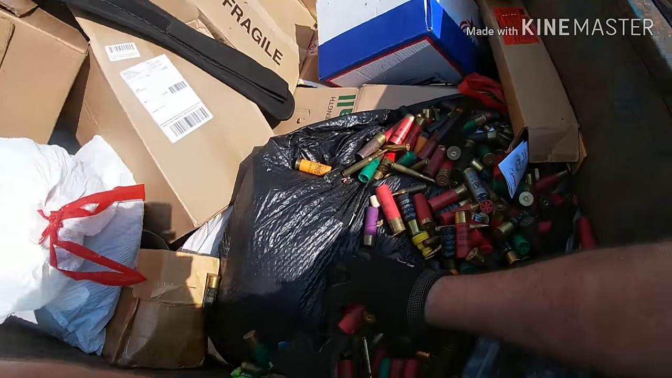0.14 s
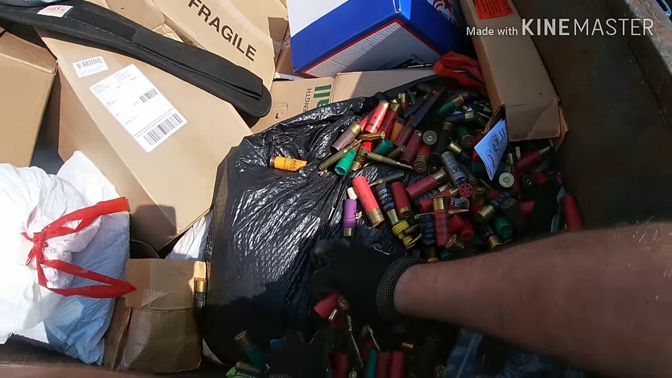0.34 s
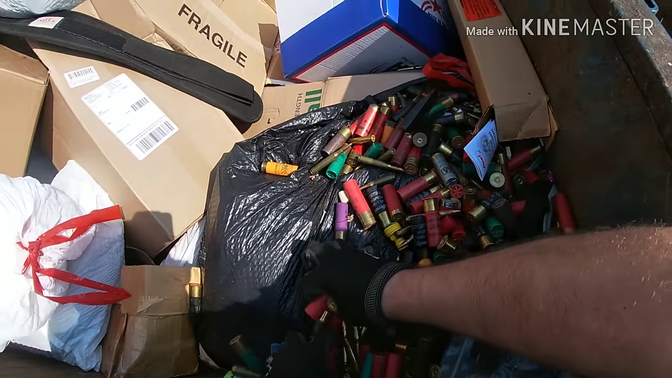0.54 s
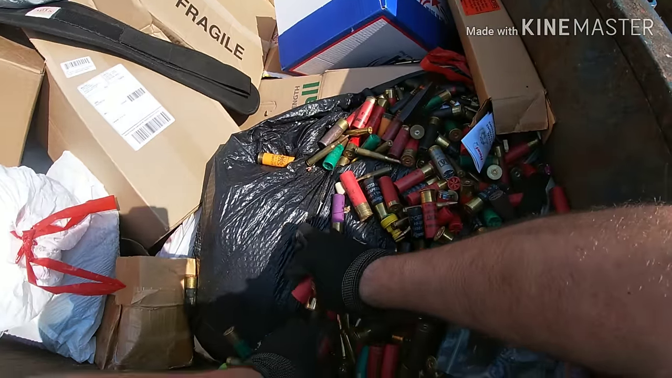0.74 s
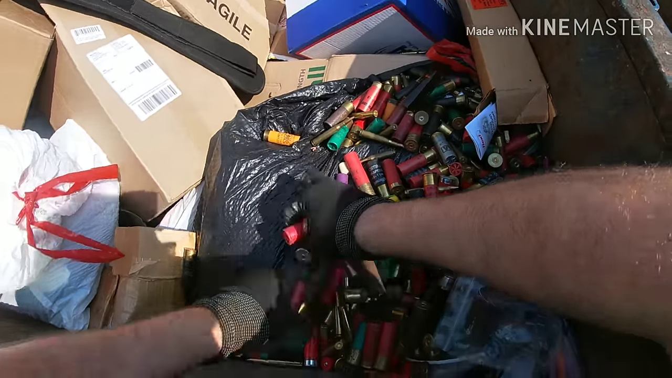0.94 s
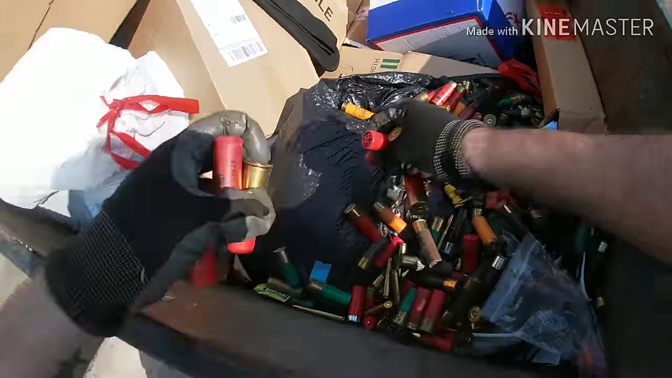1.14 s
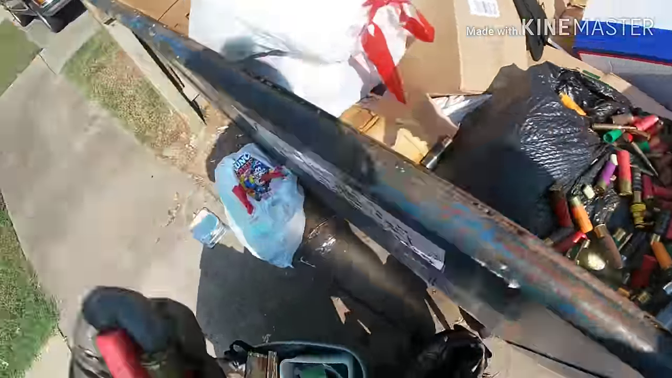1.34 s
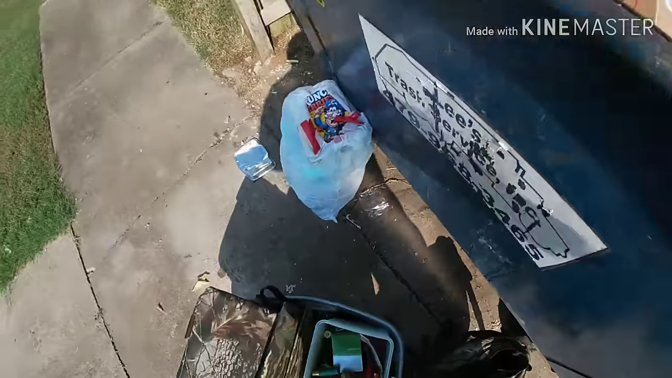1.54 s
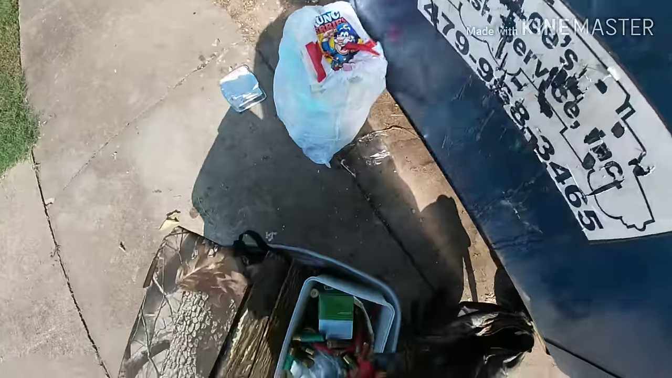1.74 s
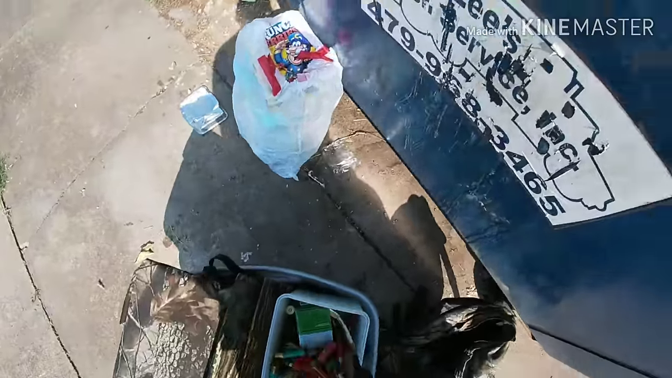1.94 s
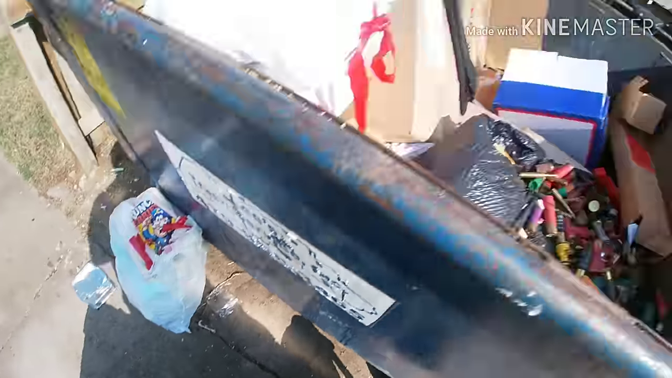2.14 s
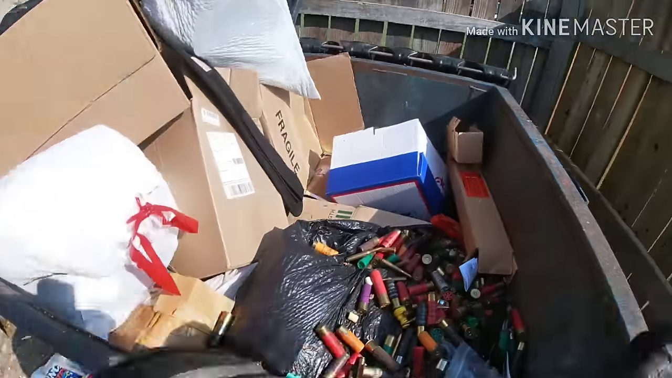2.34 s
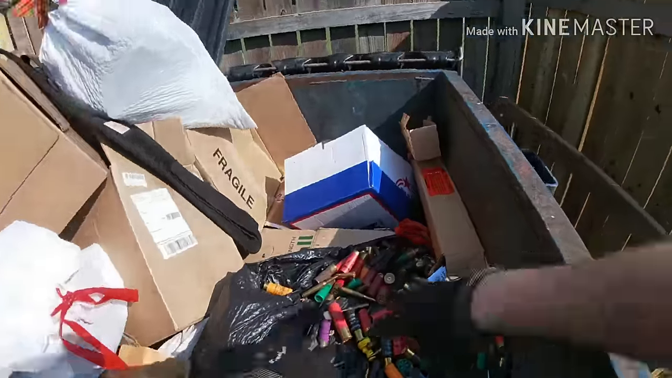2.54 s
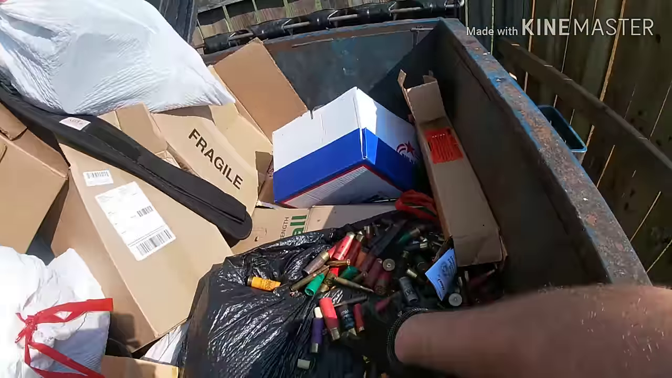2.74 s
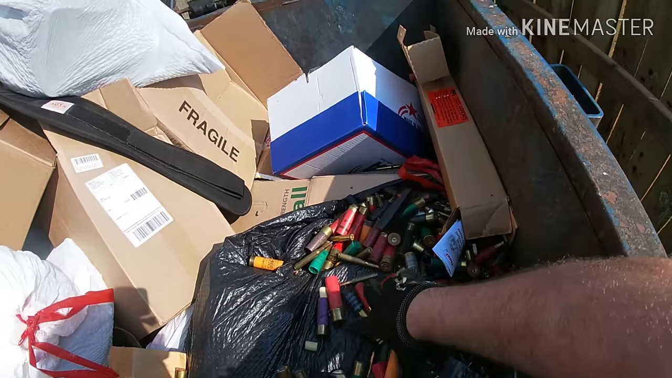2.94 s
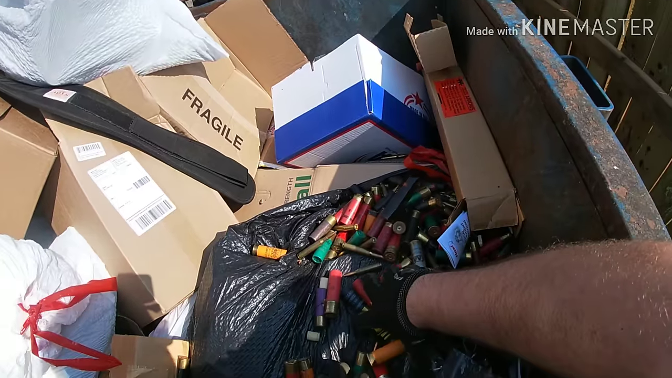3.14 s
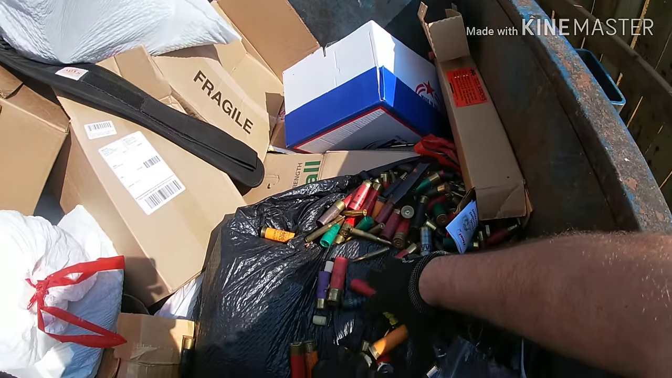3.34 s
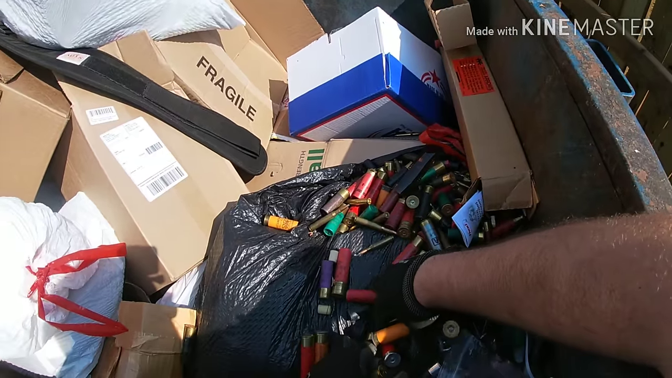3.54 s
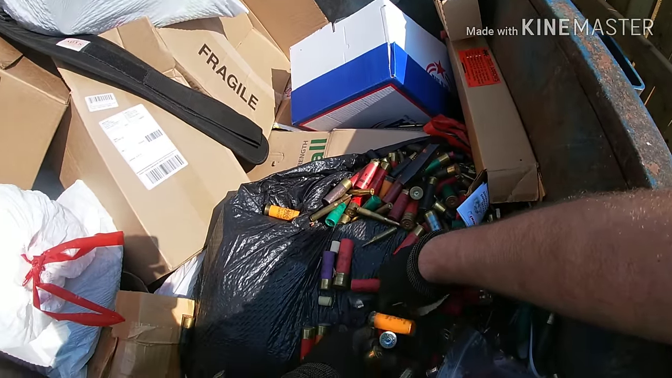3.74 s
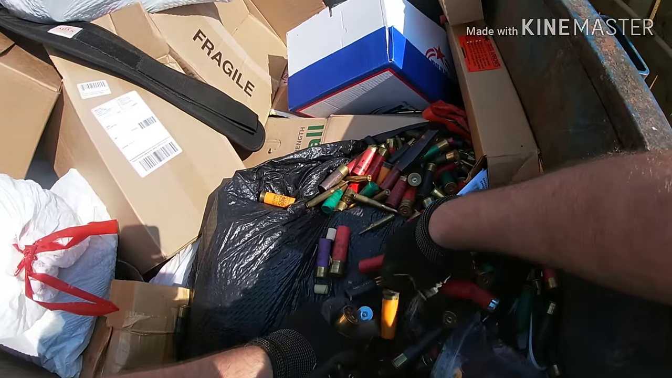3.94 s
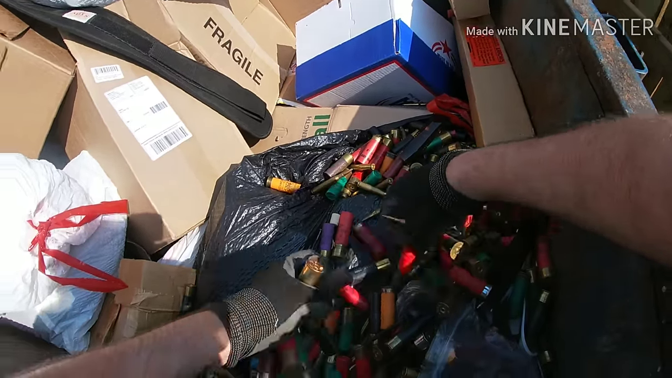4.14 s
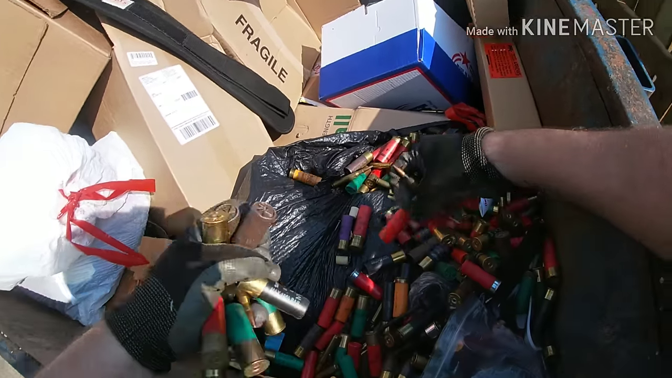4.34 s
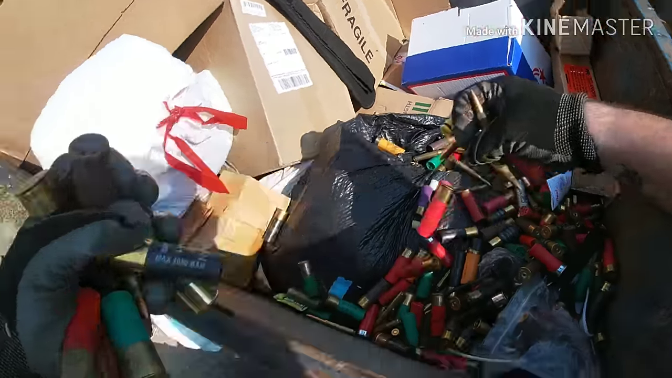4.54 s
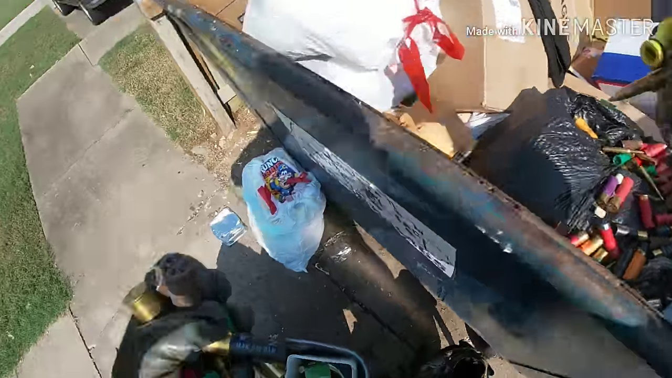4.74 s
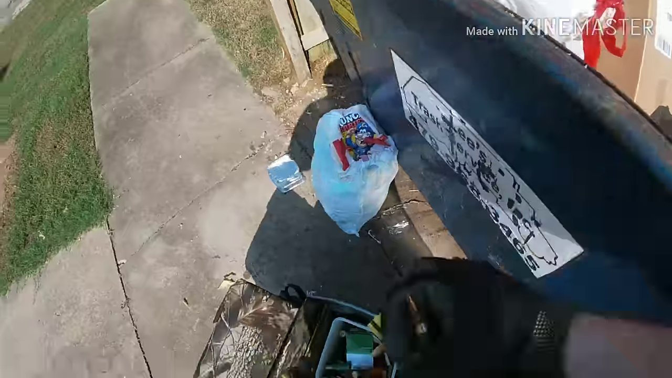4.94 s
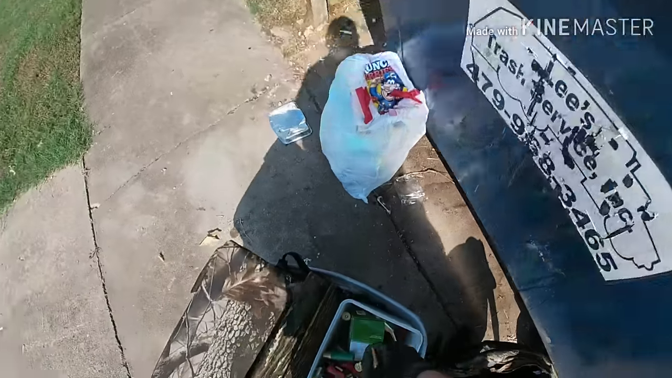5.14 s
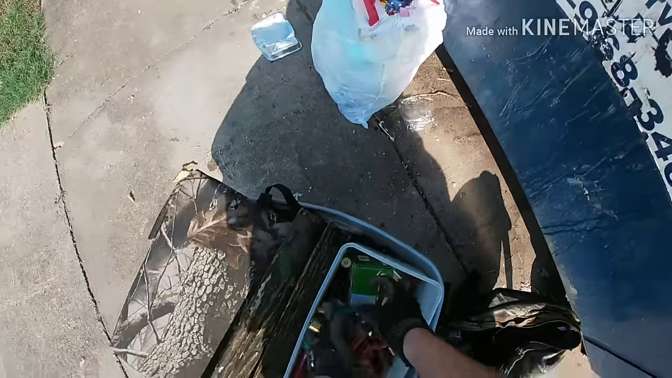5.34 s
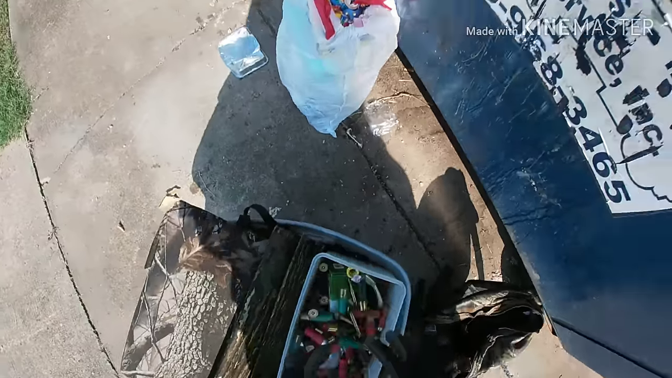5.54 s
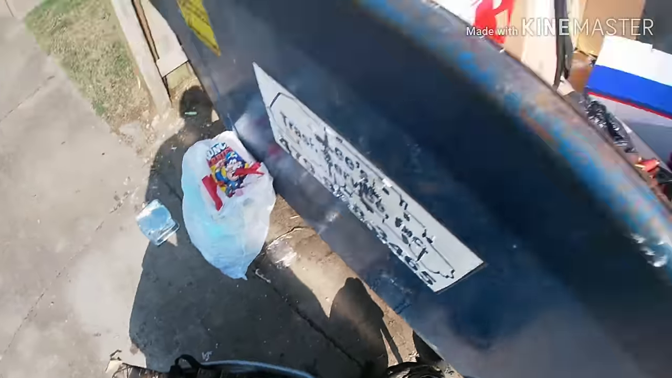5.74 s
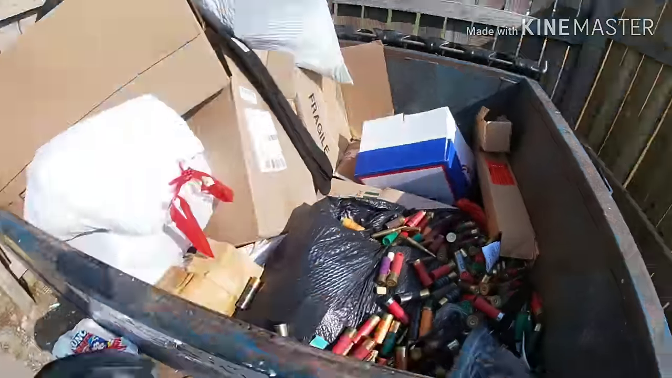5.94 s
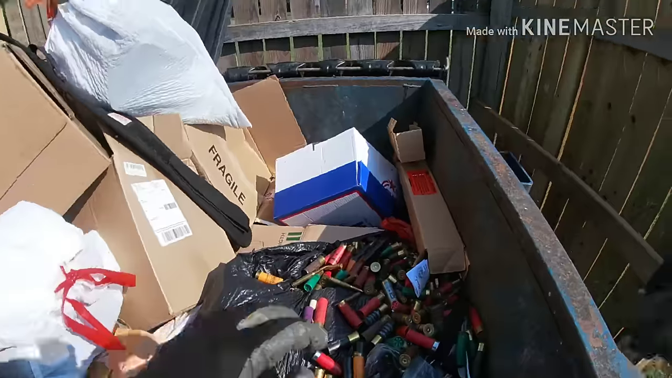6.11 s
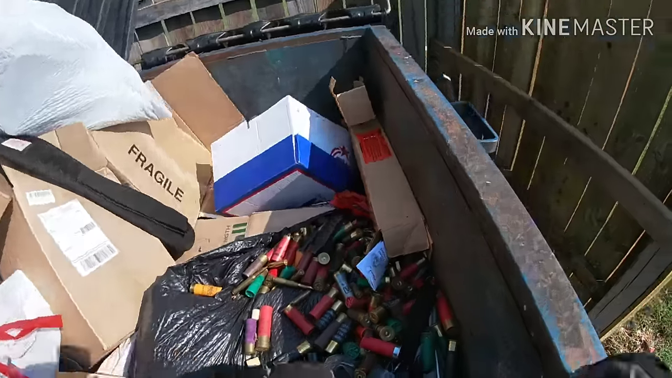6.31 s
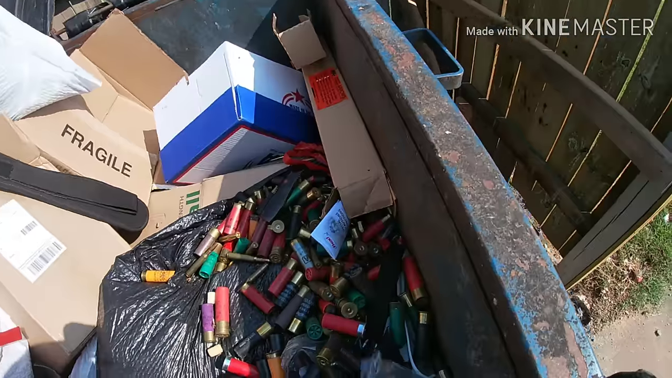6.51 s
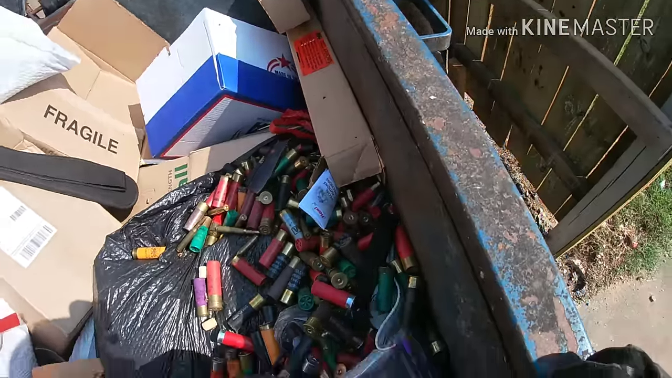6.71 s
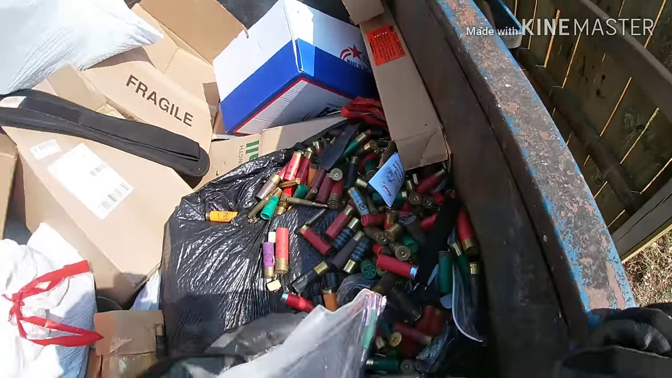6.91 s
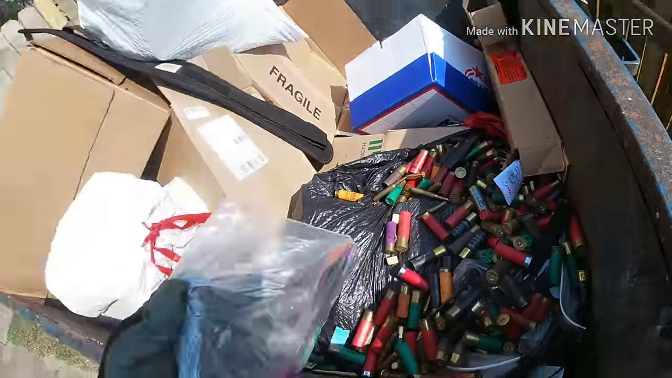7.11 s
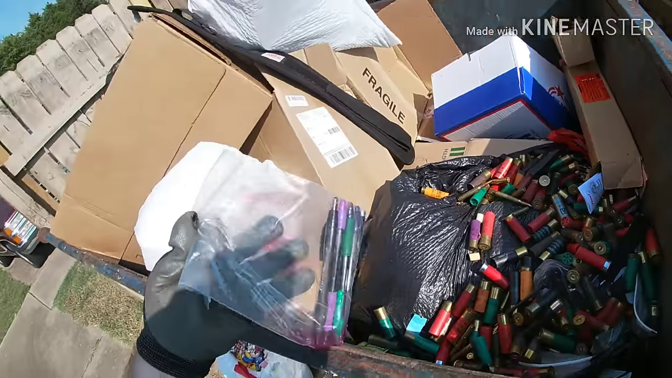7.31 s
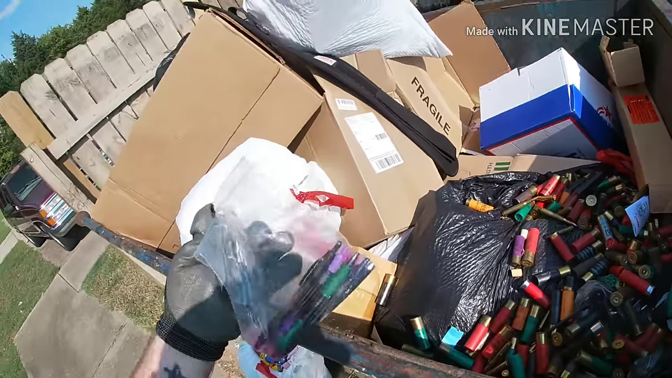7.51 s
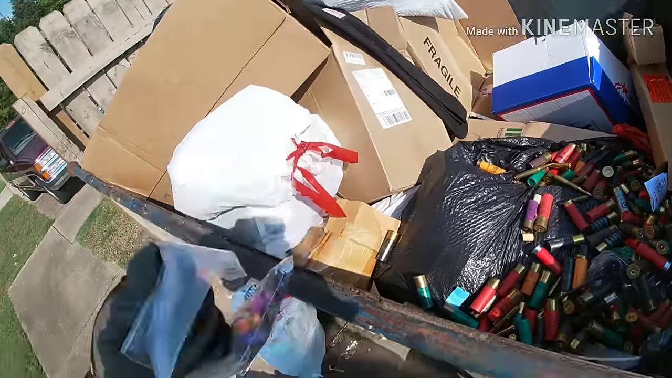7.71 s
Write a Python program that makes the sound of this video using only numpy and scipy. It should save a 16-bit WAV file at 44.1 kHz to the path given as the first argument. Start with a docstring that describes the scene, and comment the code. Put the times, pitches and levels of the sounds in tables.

```python
"""Plastic hulls clack and rattle over a sack rumble as gloved hands rake a heap of spent shotgun shells.
Brass heads ring briefly, sack and tub thud; low wind or handling rumble on a chest-worn microphone, far hum.
Handfuls drop into a plastic tub; later a thin plastic bag is lifted and crinkles.
Rubbing is clumped random grains through resonances; clacks, thuds and rings are timed decaying bursts;
low rumble, outdoor air and clothing are filtered noise."""
import sys
import numpy as np
from scipy import signal
from scipy.fft import rfft, irfft
from scipy.io import wavfile
from scipy.ndimage import uniform_filter1d

SR = 44100
rng = np.random.default_rng(int(sys.argv[2]) if len(sys.argv) > 2 else 0)


def int16_out(signal):
    """Quantize to a 16-bit WAV file."""
    q = np.round(np.clip(np.atleast_2d(signal).T, -1, 1) * 32767)
    wavfile.write(sys.argv[1], SR, q.astype(np.int16))


N = 347067

# stirring of heap and bag, one list per reach of the hands: (time [s], rattle [dB], sack rumble [dB])
REACHES = [
    [(0.0, -46, -32), (0.22, -49, -38.5), (0.27, -39, -35), (0.46, -38, -27), (0.55, -44.5, -29.5),
     (0.65, -39, -27.5), (0.85, -39, -25.5), (1.14, -44.5, -30.5), (1.29, -49.5, -37), (1.45, -58, -47),
     (1.66, -61, -45.5)],
    [(1.73, -58, -45.5), (1.99, -53, -39), (2.19, -36.5, -23), (2.24, -45, -26.5), (2.32, -56, -45),
     (2.39, -48, -35), (2.47, -82, -45)],
    [(2.72, -59, -44), (2.84, -51, -47.5), (2.93, -34.5, -24), (2.99, -40.5, -40), (3.09, -32, -26),
     (3.29, -40, -30.5), (3.4, -43.5, -36), (3.46, -31.5, -28.5), (3.68, -38.5, -36), (3.94, -42, -36.5),
     (4.15, -35.5, -33), (4.31, -39, -36.5), (4.43, -52.5, -43.5), (4.56, -46, -58), (4.68, -62, -56)],
    [(4.79, -46, -32.5), (4.9, -48, -40), (5.17, -62, -48)],
    [(5.44, -63, -49), (5.52, -31.5, -25.5), (5.61, -26.5, -16.5), (5.65, -39.5, -25.5),
     (5.77, -31.5, -19.5), (5.85, -46, -36), (6.04, -55.5, -40.5), (6.2, -69, -75)],
    [(6.52, -60, -55), (6.64, -50, -54), (6.78, -37, -38), (6.96, -40, -37), (7.13, -33, -43.5),
     (7.22, -60.5, -62), (7.34, -40.5, -41), (7.52, -39.5, -40.5), (7.6, -50.5, -43), (7.76, -53.5, -49.5),
     (7.87, -40, -50)],
]
# colour of the rattle: (frequency [Hz], density [dB per Hz])
RATTLE_COLOUR = [(710, -12), (1200, -19.5), (1360, -5.5), (1690, -3), (2280, -1.5), (3900, 0), (4570, -5.5),
                 (5150, -2), (10200, -17.5), (12600, -69), (15500, -56)]
# brass in the heap: (frequency [Hz], width [Hz], level [dB])
BRASS_PINGS = [(4260, 49, 8.5), (4900, 120, -8), (6300, 300, 7), (9900, 150, -30), (10200, 110, -11)]
# air in the hulls: (frequency [Hz], width [Hz], level [dB])
HULL_AIR = [(503, 117, 1), (867, 466, -0.5), (1052, 890, -3.5)]
# sack and boxes under the heap: (frequency [Hz], width [Hz], level [dB])
SACK_WALLS = [(110.5, 11, 1.5), (155, 50.5, -1), (231, 71, 0.5), (298, 99, -2), (440, 111, -8)]
# level of the low rumble over time, wind or handling: (time [s], level [dB])
RUMBLE_LEVEL = [(0.0, -44), (0.48, -43), (1.21, -35.5), (1.25, -27), (1.4, -42), (1.78, -30.5), (1.84, -56),
                (2.26, -30.5), (2.61, -48), (2.89, -40), (4.58, -45), (4.78, -41), (4.86, -22), (4.91, -42),
                (5.15, -50), (5.26, -23.5), (5.28, -34), (5.33, -24), (5.48, -26.5), (5.54, -54),
                (5.68, -24.5), (6.38, -62.5), (6.49, -44.5), (7.45, -51.5), (7.83, -37.5), (7.87, -40)]
# far outdoor noise: (frequency [Hz], density [dB per Hz])
AIR_COLOUR = [(18, -15), (30, 2), (168, -3.5), (223, 5), (320, -22.5), (383, -17), (640, -10.5),
              (1310, -16), (4520, -31), (5840, -31), (8590, -29), (12600, -89), (14000, -77)]
# a far machine: (frequency [Hz], width [Hz], relative level [dB])
HUM_MODES = [(382, 9, -52), (226, 20, -56)]
# hum rises and sinks as the wearer turns: (time [s], gain [dB])
HUM_GAIN = [(0, -3), (1.5, 5), (2.6, 1), (4.5, -0.5), (5.2, 2.5), (6.3, -4.5), (7.87, -3.5)]
# hull on hull, or a snap of the bag: (time [s], relative level [dB], pitch [Hz],
# hollow knock [relative dB], bright edge [relative dB], scatter before clipping [s])
CONTACTS = [(0.2369, -28, 1390, -35, -54, 0.1), (0.2849, -19, 2150, -24, -53, 0.044),
            (0.3373, -19, 1170, -29, -61, 0.021), (0.362, -34, 1310, -32, -52, 0.047),
            (0.383, -28, 1340, -36, -50, 0.058), (0.4, -25, 2120, -28, -50, 0.067),
            (0.4384, -30, 3200, -23, -58, 0.056), (0.4883, -24, 5030, -32, -45, 0.065),
            (0.5746, -34, 2450, -49, -55, 0.048), (0.5906, -24, 3480, -30, -51, 0.071),
            (0.608, -24, 4260, -24.5, -57, 0.097), (0.6514, -41, 4900, -36, -59, 0.058),
            (0.678, -16, 4840, -32, -42, 0.1), (0.7319, -16, 1400, -22, -24, 0.058),
            (0.7873, -17, 3270, -43, -38, 0.039), (0.7928, -10.5, 3070, -47, -45, 0.067),
            (0.8112, -21, 4160, -27, -45, 0.089), (0.833, -20, 1320, -19.5, -52, 0.096),
            (0.8987, -14.5, 2040, -24, -50, 0.051), (0.9373, -19, 4090, -29, -43, 0.042),
            (0.997, -12, 1670, -33, -39, 0.064), (1.0137, -14.5, 4900, -21.5, -24, 0.088),
            (1.126, -28, 1420, -30.5, -40, 0.084), (1.2309, -28.5, 1270, -28.5, -50, 0.094),
            (2.0155, -13, 1130, -22, -40, 0.066), (2.0306, -13, 1200, -37, -39, 0.11),
            (2.0613, -17, 1160, -28, -29, 0.1), (2.0878, -11, 2480, -17.5, -46, 0.13),
            (2.1122, -7.5, 3460, -16, -20, 0.069), (2.1715, -22, 1380, -37, -39, 0.07),
            (2.2089, -25, 5230, -45, -36, 0.052), (2.2283, -27.5, 5900, -50, -36, 0.09),
            (2.2758, -24.5, 4000, -36, -33, 0.066), (2.356, -37, 2200, -34, -47, 0.087),
            (2.4387, -40, 1430, -38, -65, 0.049), (2.874, -24.5, 2830, -34, -40, 0.11),
            (2.8981, -6.5, 3650, -34, -48, 0.035), (2.9165, -17, 3200, -26, -45, 0.061),
            (2.9466, -32, 1670, -45, -41, 0.05), (3.0194, -14.5, 3660, -42, -50, 0.067),
            (3.0587, -22.5, 1510, -35, -29, 0.076), (3.1012, -20, 1670, -43, -34, 0.058),
            (3.1346, -21, 3760, -49, -38, 0.046), (3.1677, -20.5, 1670, -30, -38, 0.086),
            (3.1954, -12.5, 3500, -36, -53, 0.046), (3.2382, -18, 3000, -43, -42, 0.05),
            (3.2673, -8, 3960, -53, -38, 0.041), (3.2979, -39, 1280, -21, -58, 0.058),
            (3.315, -20, 3420, -43, -33, 0.035), (3.3548, -20, 3830, -49, -31, 0.034),
            (3.3858, -13.5, 1730, -27, -52, 0.082), (3.427, -24, 1760, -37, -41, 0.048),
            (3.4485, -15, 1980, -32, -33, 0.058), (3.4733, -16, 4200, -26, -46, 0.033),
            (3.4933, -18, 2750, -28, -31, 0.12), (3.545, -20.5, 3390, -33, -31, 0.054),
            (3.5629, -15, 1340, -36, -33, 0.049), (3.5927, -18, 3900, -49, -29, 0.052),
            (3.6184, -16, 5400, -23, -39, 0.036), (3.6581, -26.5, 3190, -38, -41, 0.058),
            (3.675, -26, 2440, -29, -41, 0.044), (3.7089, -25, 3160, -25, -35, 0.04),
            (3.7684, -22.5, 2970, -36, -48, 0.069), (3.8096, -25, 4870, -38, -46, 0.089),
            (3.8487, -24, 4330, -37, -31, 0.05), (3.902, -21, 4060, -49, -28, 0.065),
            (3.9479, -29.5, 4120, -34, -44, 0.053), (3.9662, -24.5, 3510, -38, -36, 0.067),
            (3.9849, -19, 5000, -33, -41, 0.099), (4.0217, -23, 3320, -32, -36, 0.051),
            (4.0374, -28, 3970, -28, -38, 0.078), (4.0575, -30, 1220, -43, -30, 0.058),
            (4.1054, -20, 3960, -47, -40, 0.058), (4.123, -15.5, 4140, -30, -32, 0.11),
            (4.1533, -13, 3520, -42, -32, 0.1), (4.196, -23, 3070, -50, -31, 0.076),
            (4.2124, -25, 5470, -54, -37, 0.058), (4.2307, -15.5, 4970, -42, -40, 0.045),
            (4.2612, -22, 1550, -20.5, -30, 0.041), (4.274, -14, 4970, -51, -40, 0.061),
            (4.3068, -37, 1360, -33, -33, 0.058), (4.3545, -30, 4250, -56, -46, 0.077),
            (4.3878, -22.5, 2660, -42, -39, 0.089), (4.4341, -26.5, 5600, -48, -56, 0.058),
            (4.5271, -40, 2980, -55, -51, 0.063), (4.578, -25, 1320, -60, -39, 0.098),
            (4.7433, -15.5, 2830, -26, -18.5, 0.11), (4.7637, -16.5, 4050, -15, -24, 0.036),
            (4.824, -12, 4550, -24.5, -33, 0.089), (4.8519, -18, 2420, -25.5, -26, 0.068),
            (4.9898, -25.5, 1310, -44, -50, 0.066), (5.452, -7, 5230, -51, -21, 0.029),
            (5.475, -9, 2030, -22, -42, 0.064), (5.494, -9.5, 1540, -18, -21, 0.044),
            (5.516, -13, 1320, -34, -39, 0.033), (5.543, -9, 2510, -15, -22, 0.07),
            (5.5602, -12.5, 4940, -20, -14, 0.042), (5.5782, -17, 4940, -15.5, -28, 0.044),
            (5.6301, -28, 1490, -28, -44, 0.066), (5.647, -18, 2630, -25, -50, 0.072),
            (5.6888, -9.5, 4700, -18.5, -39, 0.078), (5.7144, -9.5, 1250, -38, -20, 0.042),
            (5.7502, -40, 1370, -30, -37, 0.058), (5.7815, -19, 1290, -15, -43, 0.053),
            (5.8092, -24, 1360, -42, -45, 0.064), (5.939, -32.5, 1590, -30, -50, 0.061),
            (5.9918, -29.5, 1700, -32, -59, 0.058), (6.0364, -29, 1820, -28.5, -63, 0.052),
            (6.235, -24, 1250, -37, -54, 0.079), (6.2872, -20, 1450, -29.5, -35, 0.12),
            (6.568, -37, 3030, -52, -58, 0.058), (6.584, -34, 1580, -50, -55, 0.051),
            (6.6044, -35, 1350, -43, -48, 0.065), (6.62, -24, 1410, -37, -57, 0.12),
            (6.6393, -22.5, 1770, -37, -32, 0.066), (6.6952, -40, 3270, -38, -47, 0.051),
            (6.7161, -38, 1240, -43, -37, 0.053), (6.759, -32, 1210, -43, -40, 0.053),
            (6.784, -24, 4550, -33, -33, 0.052), (6.8, -31, 1580, -37, -39, 0.053),
            (6.817, -21, 5800, -37, -39, 0.07), (6.8439, -17.5, 4040, -33, -33, 0.12),
            (6.8679, -12.5, 1130, -31, -29, 0.15), (6.8943, -9, 5340, -30, -39, 0.064),
            (6.9135, -13.5, 3330, -25, -20, 0.082), (6.9386, -13, 3870, -26.5, -54, 0.037),
            (6.9745, -17.5, 1190, -42, -51, 0.066), (6.9886, -14, 3340, -31, -47, 0.058),
            (7.021, -20, 1180, -50, -44, 0.055), (7.07, -41, 1730, -31, -36, 0.15),
            (7.0972, -18.5, 1190, -24.5, -45, 0.044), (7.1435, -28, 1190, -28, -49, 0.051),
            (7.1891, -34.5, 1340, -55, -52, 0.12), (7.227, -27, 1310, -59, -40, 0.048),
            (7.2973, -27.5, 2880, -47, -46, 0.039), (7.3304, -32, 1550, -51, -33, 0.049),
            (7.5193, -27, 5440, -36, -32, 0.058), (7.607, -31, 5050, -54, -32, 0.065),
            (7.6605, -38, 3210, -45, -57, 0.064), (7.6946, -31, 4140, -57, -60, 0.038),
            (7.7127, -30, 3100, -57, -56, 0.048), (7.7308, -34, 3400, -57, -56, 0.047),
            (7.7933, -24.5, 3530, -56, -53, 0.067), (7.818, -37, 1470, -62, -50, 0.058),
            (7.8366, -25, 2960, -58, -49, 0.072), (7.8508, -30, 1490, -55, -51, 0.058)]
# shells landing on sack or tub, bumps on the strap:
# (time [s], relative level [dB], pitch [Hz], cycles to -60 dB [count])
BUMPS = [(0.246, -35.5, 183, 20), (0.357, -31.5, 211, 31), (0.439, -26.5, 241, 12), (0.475, -29.5, 217, 17),
         (0.617, -15, 133, 6.7), (0.839, -20.5, 149, 16), (0.961, -27, 248, 5.8), (1.01, -25, 215, 7),
         (1.127, -19, 144, 7.2), (1.825, -43.5, 178, 48), (2.023, -20.5, 327, 3.7), (2.1, -17, 377, 8.3),
         (2.173, -27, 135.6, 37), (2.367, -34, 276, 15), (2.886, -38, 268, 13), (2.902, -39, 104, 22),
         (3.071, -29.5, 104, 31), (3.292, -32, 263, 17), (3.443, -26.5, 266, 21), (3.647, -32.5, 155, 15),
         (3.988, -28, 223, 23), (4.26, -21, 279, 9.9), (4.759, -16, 245, 5), (4.82, -16, 124, 2.6),
         (4.988, -37.5, 113, 15), (5.236, -38, 79.5, 7.4), (5.321, -13.5, 154, 4.4),
         (5.379, -28.5, 101, 11), (5.478, -14, 322, 5.7), (5.575, -21, 263, 14), (5.884, -34.5, 327, 34),
         (5.991, -29.5, 291, 15), (6.237, -32.5, 450, 7), (6.286, -31, 406, 5.7), (6.638, -35, 224, 6.2),
         (6.864, -40, 216, 28), (7.14, -36, 355, 12), (7.347, -42, 112, 9.7), (7.516, -38, 164, 5.6)]
# brass heads struck: (time [s], level [dB], pitch [Hz], free ring before damping [s], upper modes [dB])
HEAD_STRIKES = [(0.487, -33, 6600, 0.023, -30), (0.6502, -18.5, 4900, 0.018, -36),
                (0.6779, -15, 4900, 0.014, -22), (0.732, -33, 4870, 0.009, -17),
                (0.8086, -15.5, 4140, 0.0069, -38), (0.9357, -19, 4100, 0.0028, -32),
                (1.0136, -23.5, 4900, 0.014, -4), (3.622, -27, 5590, 0.008, -28),
                (3.901, -24, 3870, 0.005, -17), (3.9854, -23, 4900, 0.0079, -34),
                (4.022, -33, 3970, 0.006, -24), (4.0382, -27, 3950, 0.0066, -10),
                (4.1056, -34, 4000, 0.0083, -28), (4.2318, -30, 4740, 0.007, -26),
                (4.2737, -24, 5180, 0.015, -28), (4.4358, -35, 5900, 0.0055, -34),
                (4.7647, -22, 3970, 0.0074, -26), (5.4424, -31, 5250, 0.012, -23),
                (5.5397, -19.5, 5130, 0.009, -24), (5.5613, -13.5, 4950, 0.009, -22),
                (5.5744, -10.5, 4930, 0.0094, -15), (5.5936, -22, 4860, 0.0081, -10),
                (5.6885, -23, 4950, 0.0066, -29)]
# upper modes of a head: (multiple of pitch [ratio], level [dB])
UPPER_MODES = [(1.99, 0), (2.2, -12)]
# soft swishes, likely clothing as the arms swing: (middle [s], length [s], level [dB])
ARM_SWINGS = [(1.287, 0.16, -57), (1.855, 0.44, -55), (2.773, 0.2, -50.5), (5.3, 0.53, -58),
              (6.502, 0.19, -71)]
# colour of the swishes: (frequency [Hz], width [Hz], level [dB])
CLOTH_MODES = [(1440, 390, -2), (3200, 560, -7)]
# handfuls poured into the tub: (time [s], tub floor [relative dB], tub air [relative dB])
HANDFULS = [
    [(2.0, -43, -44), (2.018, -14, -34), (2.04, -9, -53), (2.088, -19, -53), (2.108, -7, -34),
     (2.156, -21, -60), (2.18, -19, -55), (2.3, -46, -78)],
    [(5.46, -41, -78), (5.48, -2.5, -2.5), (5.522, -17, -30), (5.616, -13.5, -8), (5.636, -10, -43),
     (5.672, -23, -29), (5.694, -12.5, -22), (5.794, -22.5, -34), (5.86, -73, -67)],
]
# floor of the tub: (frequency [Hz], width [Hz], level [dB])
FLOOR_MODES = [(245, 237, -2), (304, 115, 3), (369.4, 114, -8)]
# air in the tub: (frequency [Hz], width [Hz], level [dB])
TUB_AIR_MODES = [(688, 260, -10), (808, 71, -2.5), (844, 88, -3), (970, 45, -5)]
# stereo difference: (frequency [Hz], side filter gain [dB])
SIDE_GAIN = [(60, -77), (110, -84), (200, -86), (380, -79), (700, -80), (1290, -59), (2380, -89),
             (4400, -36), (8120, -30.5), (15000, 7)]

BAG_START_S = 6.1  # heap before, bag after
BUSY_DB = -49.5  # rattle level above which ticks and pings come at full rate
SHEEN_DB, BAG_SHEEN_DB = -26.5, -29  # relative to the rattle
HOLLOW_SHARE, HOLLOW_DB = 0.17, -2.5  # share of rumble against rattle in the hull-air level; offset
AIR_DB = -47
CUTOFF_HZ = 15750


def amp(db):
    """Decibels to gain."""
    return 10 ** (np.asarray(db) / 20)


def rms_one(x):
    """Scale to unit rms."""
    return x / np.sqrt(np.mean(x ** 2) + 1e-20)


def in_time(rows):
    """Columns of a time table, interpolated to every sample."""
    s, *columns = np.transpose(rows)
    return [np.interp(np.arange(N) / SR, s, c) for c in columns]


def colour(x, spectrum):
    """Causal filter with the given spectrum (minimum phase from the folded cepstrum)."""
    hz, db = np.transpose(spectrum)
    grid_hz = np.maximum(np.arange(2049) * SR / 4096, 1)
    log_gain = np.interp(np.log(grid_hz), np.log(hz), db) * np.log(10) / 20
    cepstrum = irfft(log_gain)
    cepstrum[1:2048] *= 2
    cepstrum[2049:] = 0
    response = irfft(np.exp(rfft(cepstrum)))
    return signal.fftconvolve(x, response)[:len(x)]


def filtered(x, order, hz, kind):
    """Butterworth filter."""
    return signal.sosfilt(signal.butter(order, hz, kind, fs=SR, output="sos"), x)


def resonance(x, hz, width_hz):
    """Two-pole peak of gain 1."""
    r = np.exp(-np.pi * width_hz / SR)
    zeros = [(1 - r * r) / 2, 0, (r * r - 1) / 2]
    poles = [1, -2 * r * np.cos(2 * np.pi * hz / SR), r * r]
    return signal.lfilter(zeros, poles, x)


def body(x, modes):
    """Parallel resonances with alternating signs."""
    return sum((-1) ** k * amp(db) * resonance(x, hz, width_hz)
               for k, (hz, width_hz, db) in enumerate(modes))


def drift(rate_hz):
    """Slow random wander of spread 1."""
    r = np.exp(-2 * np.pi * rate_hz / SR)
    wander = signal.lfilter([1], [1, -2 * r, r * r], rng.standard_normal(N + SR))
    return rms_one(wander[SR:])  # settled part only


def grains(per_s, spread_db, clump_db):
    """Random contacts of uneven size that come in clumps, over a faint continuous rub."""
    sizes = amp(spread_db * np.minimum(rng.exponential(1, N), 4.0)) * rng.choice([-1, 1], N)
    born = rng.random(N) < per_s * amp(clump_db * drift(25)) / SR
    return rms_one(sizes * born) + 0.12 * rng.standard_normal(N)


def add(track, s, burst):
    """Mix a burst into the track at time s."""
    i = round(s * SR)
    track[i:i + len(burst)] += burst[:N - i]


def ring_dealt(clicks, dealt, pitches_hz, relative_width):
    """Each click rings a few cycles at the pitch dealt to it."""
    return sum(resonance(clicks * (dealt == k) + 1e-18, hz, relative_width * hz) / np.sqrt(hz / 4000)
               for k, hz in enumerate(pitches_hz))


def rattle(rattle_db):
    """Dense rub of tiny contacts, each ringing at its own pitch; in the heap some touch brass."""
    clicks = grains(per_s=4000, spread_db=1.5, clump_db=4.5)
    busy = np.minimum(amp(2 * (rattle_db - BUSY_DB)), 1)
    pitches_hz = np.geomspace(1300, 14000, 16)
    dealt = rng.integers(0, 16, N)
    rings = ring_dealt(clicks, dealt, pitches_hz, 0.36)
    # lone sharper ticks stand out
    ticks = rng.standard_normal(N) ** 2 * (rng.random(N) < 130 * busy / SR)
    snaps = ring_dealt(ticks, dealt, pitches_hz, 0.5)
    contacts = rms_one(rings + 0.3 * clicks) + 0.53 * rms_one(snaps)
    plastic = rms_one(colour(contacts, RATTLE_COLOUR))
    shape = (len(BRASS_PINGS), N)
    touches = rng.standard_normal(shape) * (rng.random(shape) < 14 * busy ** 2 / SR)
    pings = sum(body(touch + 1e-18, [mode]) for touch, mode in zip(touches, BRASS_PINGS))
    heap = np.arange(N) < BAG_START_S * SR  # the bag has no brass
    return amp(rattle_db) * (plastic + 0.18 * heap * rms_one(pings))


def sheen(rattle_db):
    """Plastic film slides: smooth, flickering treble that follows the stirring."""
    high = filtered(rng.standard_normal(N), 4, [8500, 13000], "band")
    level_db = np.where(np.arange(N) < BAG_START_S * SR, SHEEN_DB, BAG_SHEEN_DB)
    return amp(rattle_db + level_db + 3.5 * drift(12)) * rms_one(high)


def sack_rumble(rattle_db, rumble_db):
    """Stirring grains excite the air in the hulls and the sack walls."""
    clicks = grains(per_s=500, spread_db=0.0, clump_db=6.5)
    hollow = rms_one(body(body(clicks, HULL_AIR), [(966, 660, 0)]))
    shaken = body(clicks + 0.56 * rng.standard_normal(N), SACK_WALLS)
    walls = rms_one(filtered(shaken, 2, 80, "high"))
    hollow_db = HOLLOW_DB + HOLLOW_SHARE * rumble_db + (1 - HOLLOW_SHARE) * rattle_db
    return amp(hollow_db) * hollow + amp(rumble_db) * walls


def low_rumble():
    """Lumpy low rumble of wind or handling, mostly 22-95 Hz, at an uneven level."""
    lumps = rng.standard_normal(N) * amp(1.6 * drift(36))
    low = filtered(lumps, 2, [22, 95], "band")
    return amp(in_time(RUMBLE_LEVEL)[0]) * rms_one(low)


def outdoors():
    """Gently swaying far noise, plus two narrow noise hums."""
    hums = sum(amp(db) * rms_one(resonance(rng.standard_normal(N), hz, width_hz))
               for hz, width_hz, db in HUM_MODES)
    sway = amp(1.5 * drift(1.2))
    air = rms_one(colour(rng.standard_normal(N), AIR_COLOUR))
    return amp(AIR_DB) * sway * air + amp(in_time(HUM_GAIN)[0]) * hums


def clacks():
    """A hard tick, a few cycles at the contact's pitch, a hollow knock; neighbours shift in uneven ticks."""
    t = np.arange(2400) / SR
    noise = rng.standard_normal((len(CONTACTS), 4, len(t)))
    near, wide, edge, knock = np.zeros((4, N))
    tick = amp(-60 * t / 0.004)
    for (s, db, hz, knock_db, edge_db, scatter_s), (a, b, c, d) in zip(CONTACTS, noise):
        lumps = np.clip(rms_one(uniform_filter1d(d, size=40)), -2, 1.5) * (1 - np.exp(-t / 0.003))
        dying = amp(7.5 * lumps - 60 * t / np.clip(scatter_s, 0.008, 0.12))
        hit_s = s + 0.00064  # the main contact follows the first touch
        crack = np.sin(2 * np.pi * hz * t) * amp(-60 * t * hz / 11.8)  # -60 dB in 11.8 cycles
        mode = [(hz, 0.5 * hz, 0)]
        scatter = body(body(a * dying, mode), mode) / np.sqrt(hz / 3000)
        add(near, hit_s, amp(db + 1.0) * crack)
        add(near, s, amp(db - 1.5) * scatter)
        add(wide, hit_s, amp(db - 23) * np.sign(b) * tick + amp(db - 13) * b * dying)
        add(edge, hit_s, amp(edge_db + 4.0) * np.sign(b) * tick + amp(edge_db - 3.5) * b * dying)
        add(knock, s, amp(knock_db + 18) * c * (dying + 0.5 * tick))
    # keep the level of white noise through the rattle colour
    wide = colour(wide, RATTLE_COLOUR) / np.std(colour(rng.standard_normal(N), RATTLE_COLOUR))
    edge = filtered(edge + 1e-18, 4, [6000, 10800], "band")
    hollow = body(body(knock + 1e-18, HULL_AIR), [(806, 850, 0)])
    return near + wide + edge + hollow


def thuds():
    """A soft push swings the wall for a few cycles."""
    t, out = np.arange(4000) / SR, np.zeros(N)
    for s, db, hz, cycles in BUMPS:
        swell = 1 - np.exp(-t * hz * 10.3)
        swing = np.sin(2 * np.pi * hz * t) * amp(-60 * t * hz / cycles)
        add(out, s, amp(db + 12.5) * swell * swing)
    return filtered(out + 1e-18, 2, 60, "high")


def brass():
    """A head rings in two close, beating modes plus upper ones until a neighbour damps it."""
    t, out = np.arange(3000) / SR, np.zeros(N)
    splits = rng.uniform(0.024, 0.042, len(HEAD_STRIKES))
    for (s, db, hz, free_s, upper_db), split in zip(HEAD_STRIKES, splits):
        decay_db = -60 * t / 0.12 - 60 * np.maximum(t - free_s, 0) / 0.02  # free, then damped
        shape = (1 - np.exp(-t / 0.001)) * amp(decay_db)
        upper = sum(amp(upper_db + d) * np.sin(2 * np.pi * m * hz * t) for m, d in UPPER_MODES)
        pair = np.sin(2 * np.pi * hz * t) - 0.3 * np.sin(2 * np.pi * hz * (1 + split) * t)
        add(out, s, amp(db) * shape * (pair + upper))
    return out


def swishes():
    """Smooth rubbing noise that swells and fades."""
    t = np.arange(N) / SR
    swell = sum(amp(db) * np.exp(-(2 * (t - s) / length_s) ** 2) for s, length_s, db in ARM_SWINGS)
    cloth = body(body(rng.standard_normal(N), CLOTH_MODES), CLOTH_MODES)
    return swell * rms_one(cloth)


def pours():
    """A dense hail of shells keeps floor and air of the tub ringing."""
    clicks, out = grains(per_s=250, spread_db=3.0, clump_db=2.0), np.zeros(N)
    floor = rms_one(body(body(clicks, FLOOR_MODES), FLOOR_MODES))
    air = rms_one(body(body(clicks, TUB_AIR_MODES), TUB_AIR_MODES))
    for rows in HANDFULS:
        floor_db, air_db = in_time(rows)
        start_s, end_s = rows[0][0], rows[-1][0]
        gate_s = [start_s, start_s + 0.049, end_s - 0.03, end_s]
        falling = np.interp(np.arange(N) / SR, gate_s, [0, 1, 1, 0])
        out += falling * (amp(floor_db - 5.5) * floor + amp(air_db - 4.0) * air)
    return out


def scene():
    """All sources mixed nearly mono, with some stereo width in the highest treble."""
    rattle_db, rumble_db = in_time(np.vstack(REACHES))
    stirring = rattle(rattle_db) + sheen(rattle_db) + sack_rumble(rattle_db, rumble_db)
    background = low_rumble() + outdoors()
    impacts = clacks() + thuds() + brass()
    mid = stirring + background + impacts + swishes() + pours()
    side = colour(np.roll(mid, 130) + 0.3 * mid, SIDE_GAIN)  # roll: 130 samples late
    return np.array([mid + side, mid - side])


def record(dry):
    """The housing dulls the top octave, peaks are rounded, the top is cut."""
    dull = filtered(dry, 2, 13500, "low")
    rounded = 0.9 * np.tanh(dull / 1.093)
    return signal.sosfilt(signal.cheby2(12, 70, CUTOFF_HZ, fs=SR, output="sos"), rounded)


dry = scene()
out = record(dry)
int16_out(out)
```